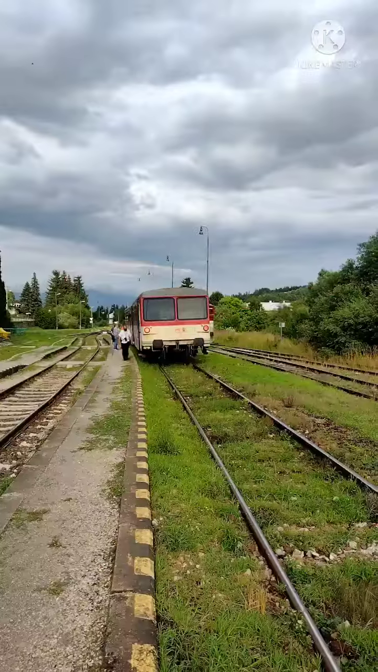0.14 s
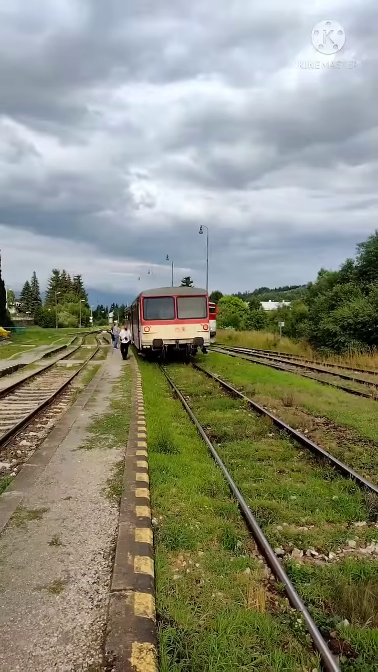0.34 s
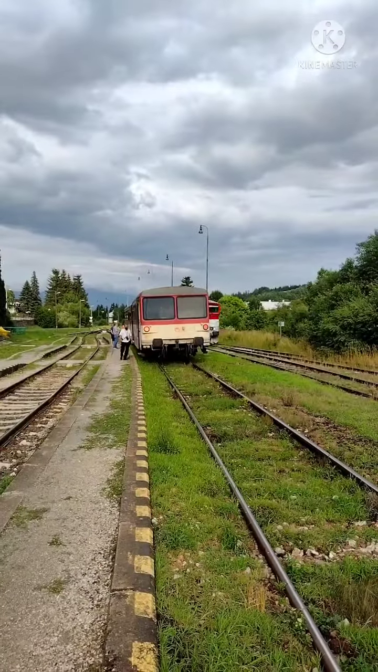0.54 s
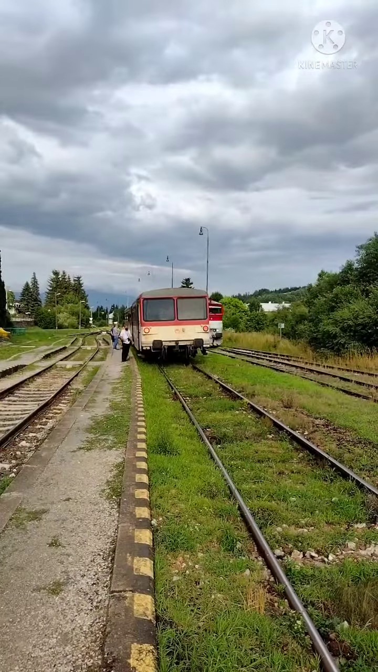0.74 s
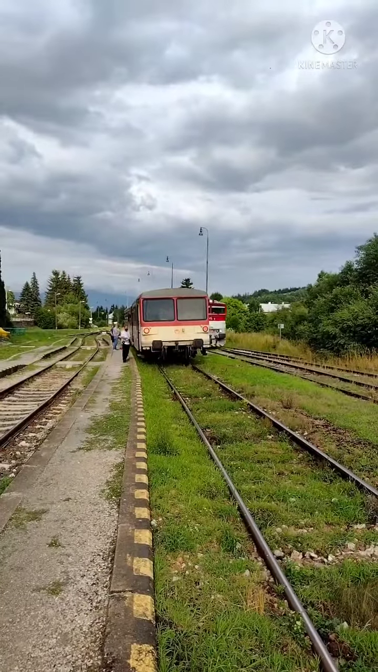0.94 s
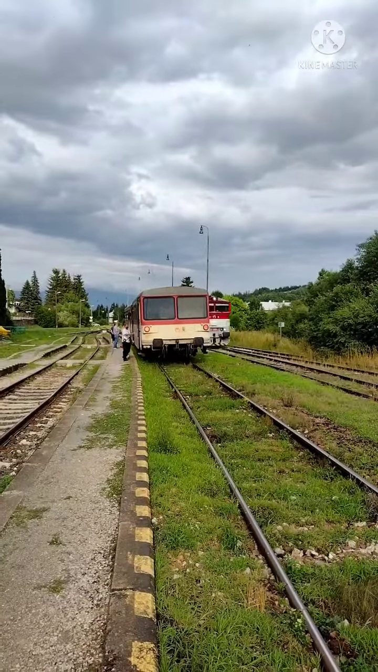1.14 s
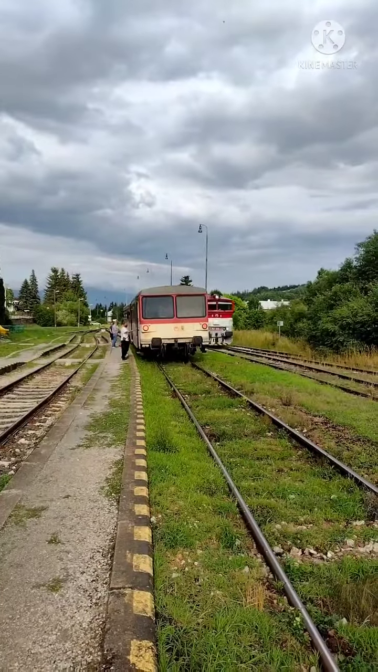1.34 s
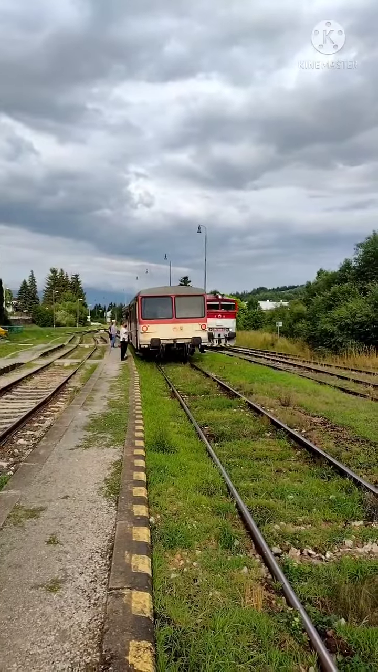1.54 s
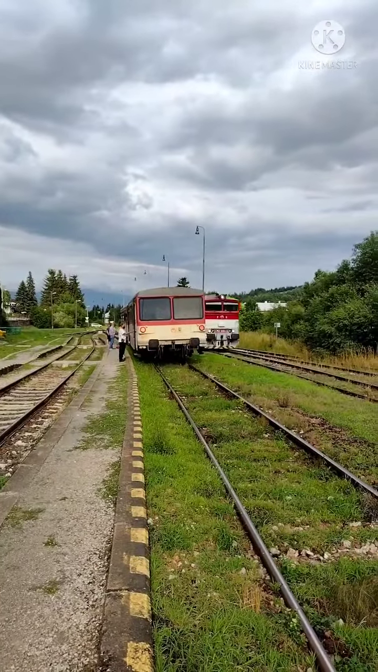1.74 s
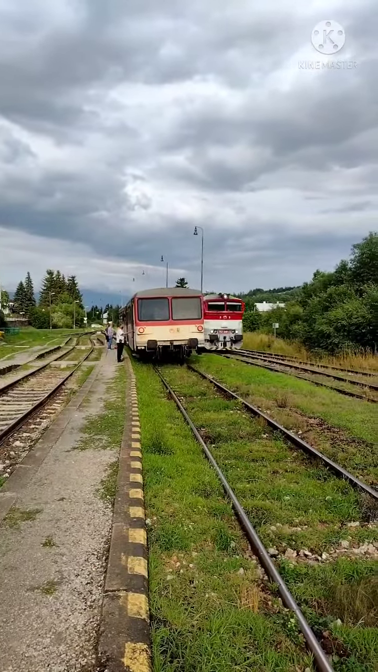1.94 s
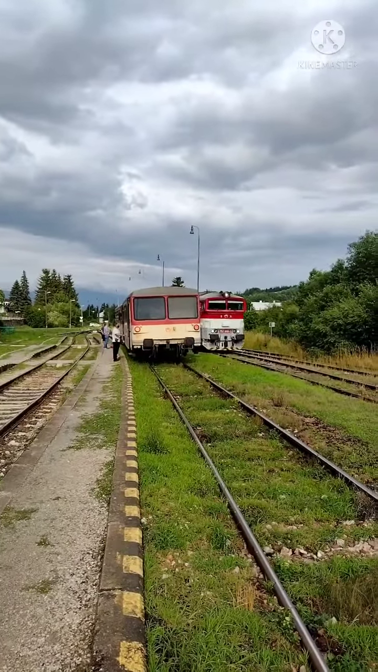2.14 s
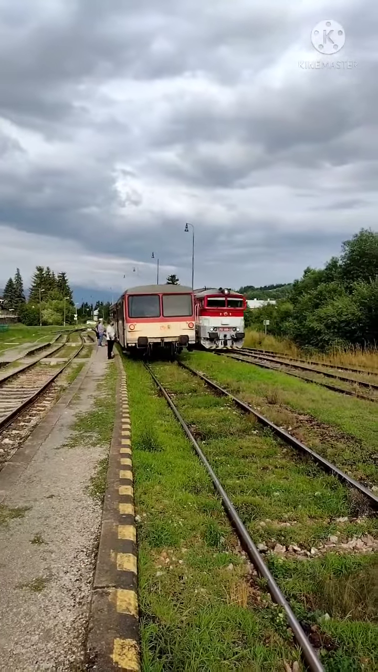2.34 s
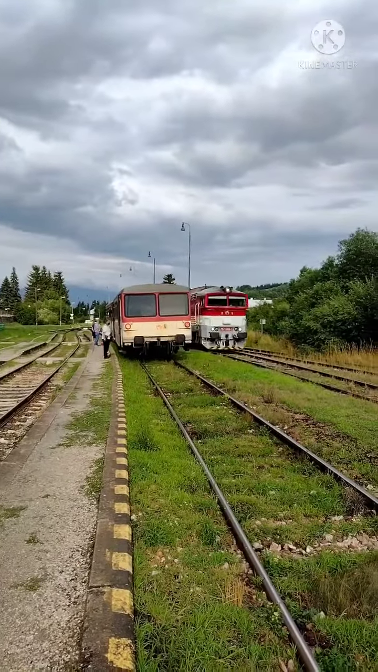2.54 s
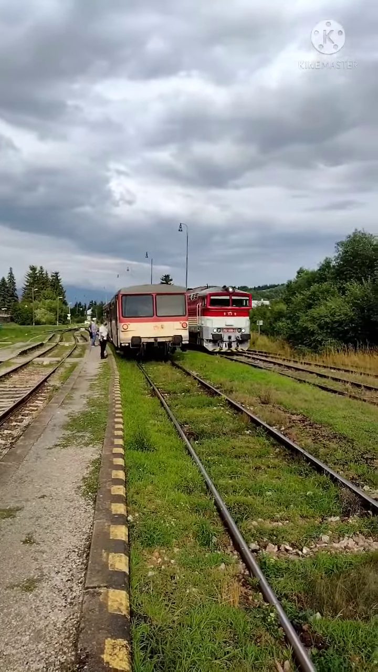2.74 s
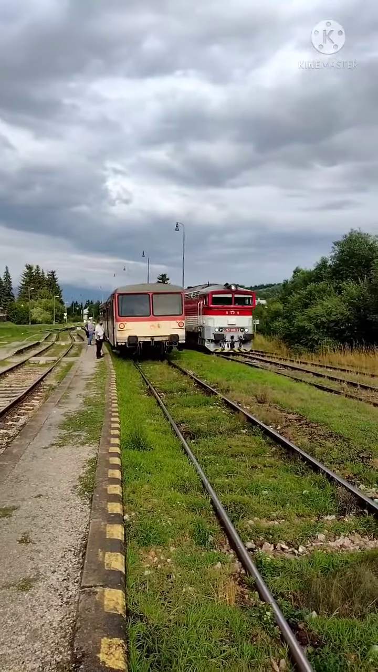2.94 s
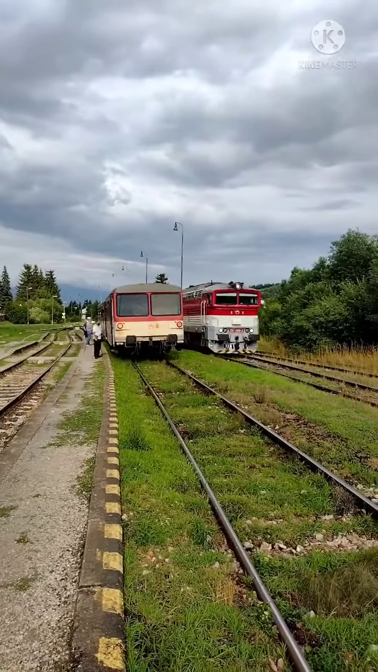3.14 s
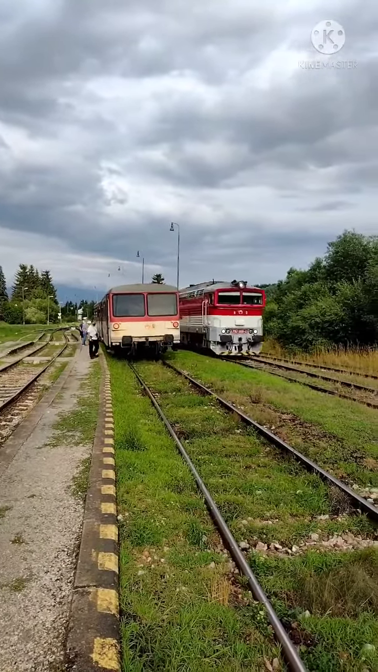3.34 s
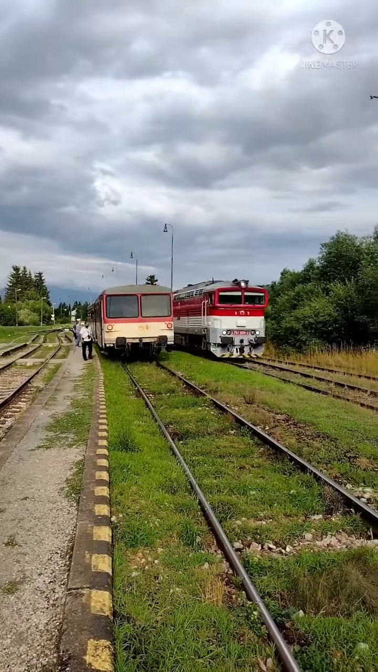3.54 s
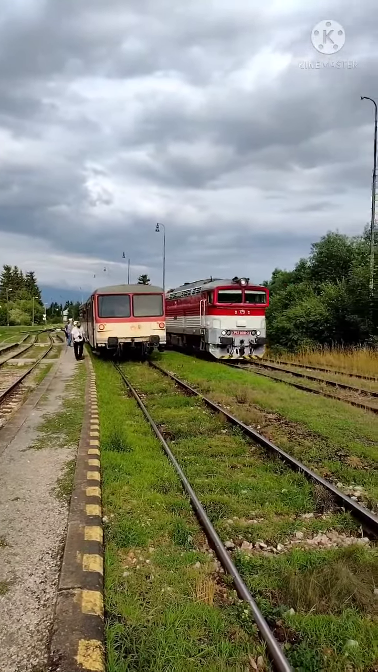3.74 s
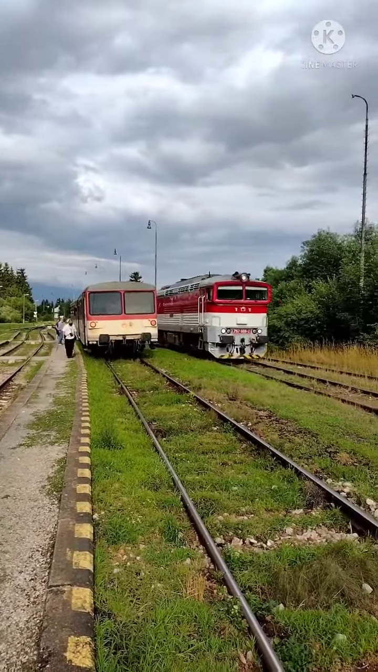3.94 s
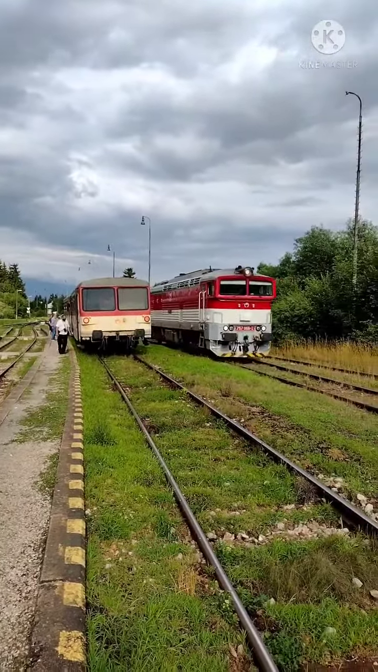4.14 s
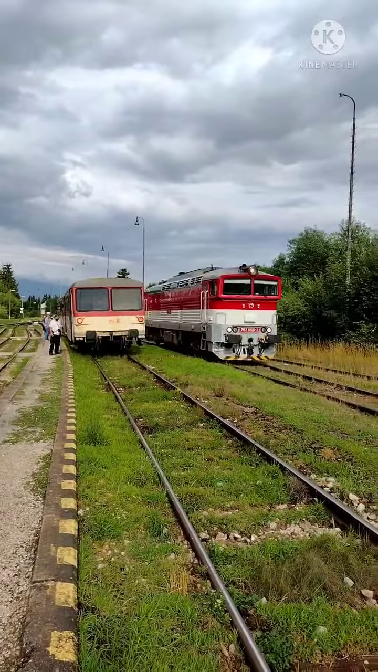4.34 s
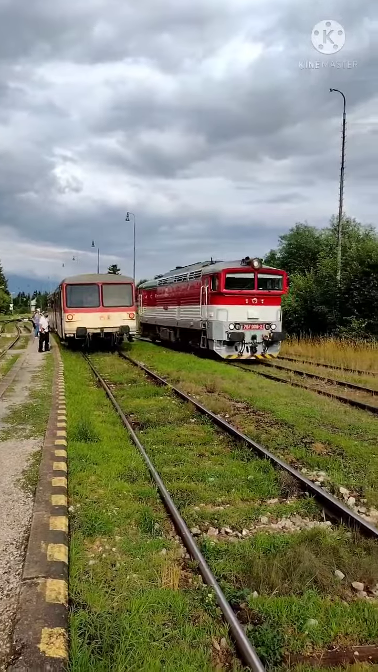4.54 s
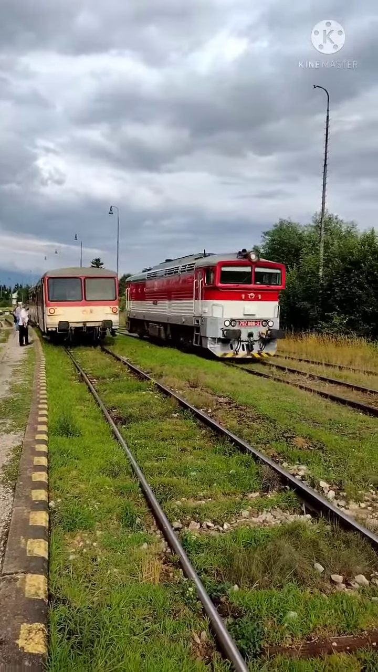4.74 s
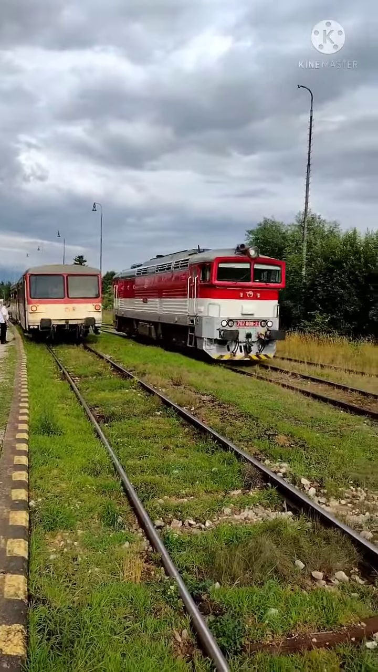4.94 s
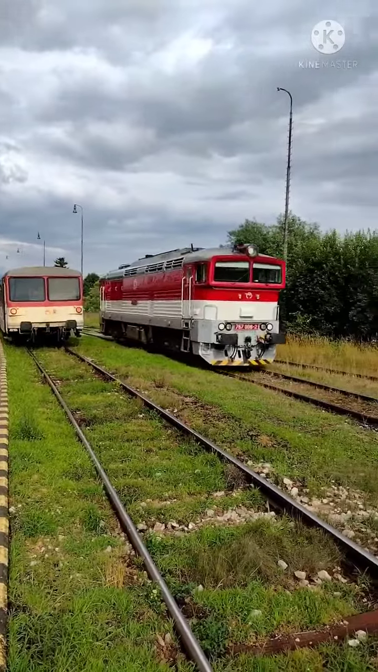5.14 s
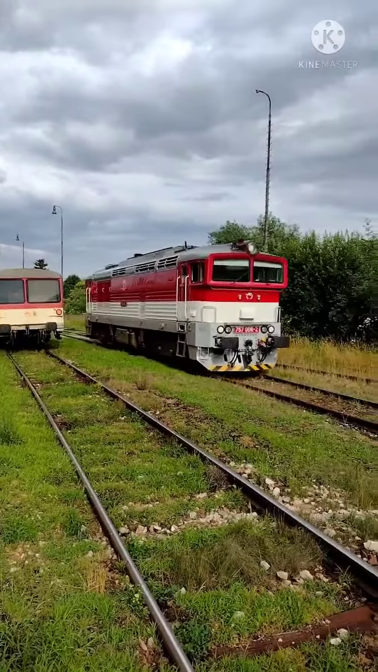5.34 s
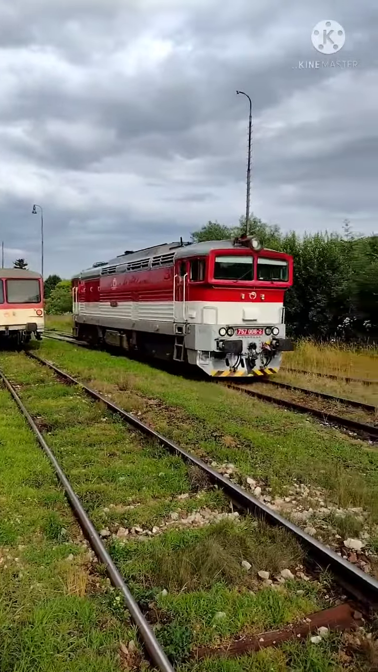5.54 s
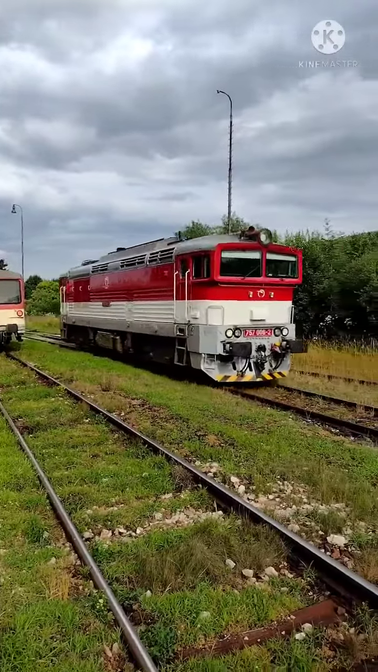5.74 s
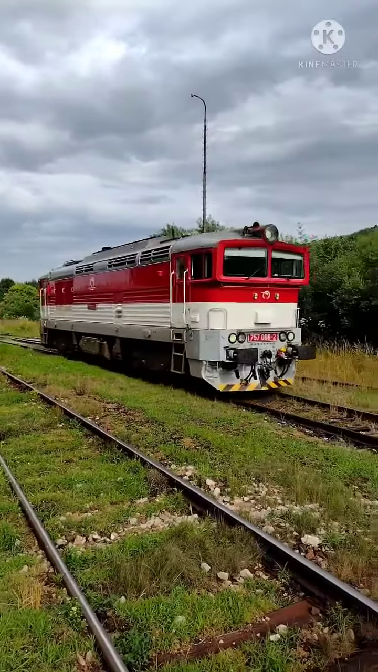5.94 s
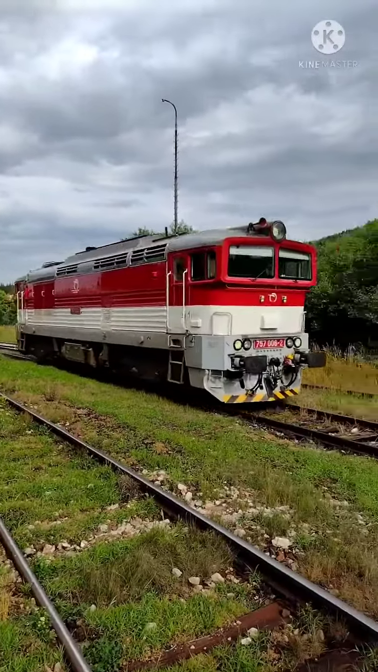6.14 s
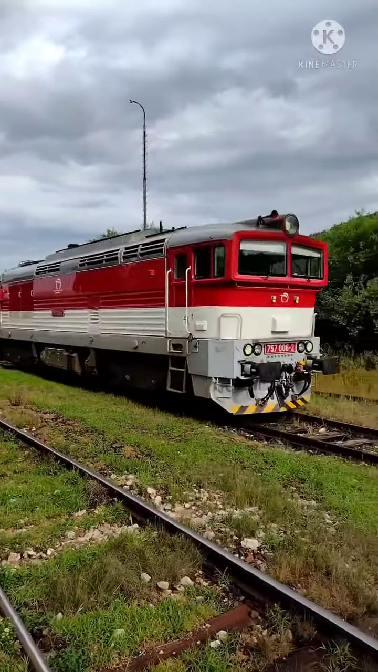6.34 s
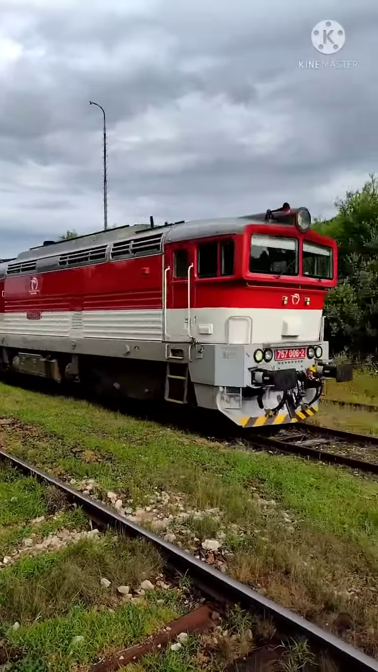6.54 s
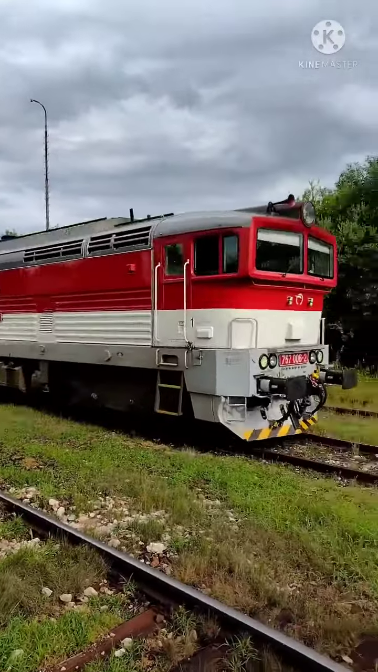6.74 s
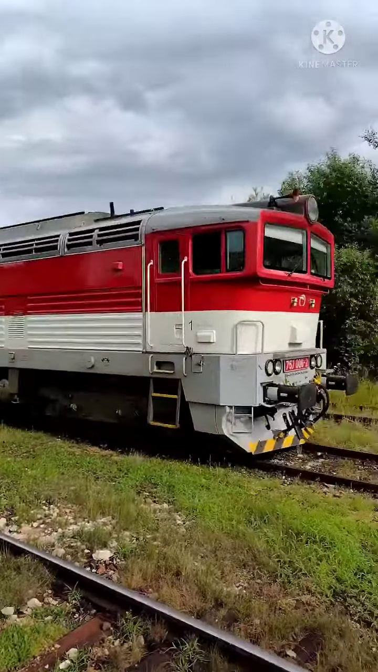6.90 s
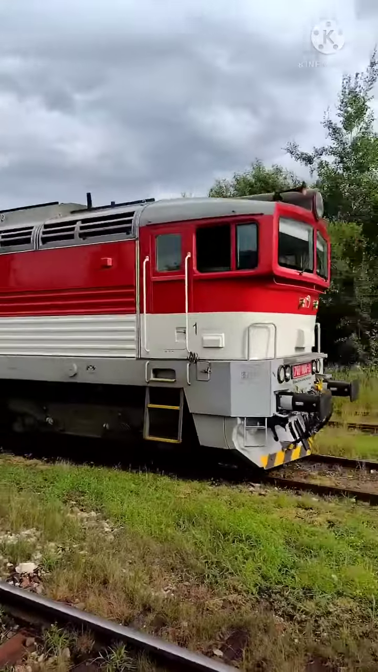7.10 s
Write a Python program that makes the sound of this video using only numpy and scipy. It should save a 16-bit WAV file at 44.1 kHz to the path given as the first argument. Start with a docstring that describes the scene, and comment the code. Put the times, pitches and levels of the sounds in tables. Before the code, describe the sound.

Open station tracks, heard through a stereo phone microphone. From 0 to 1.4 s there is faint background wash, low wind, a tiny tick at 0.2 and a distant muffled diesel throb; soft paired thumps start near 0.7. At 1.4 a heavier joint thump and clang, its second axle following 0.4 s later. Between 1.6 and 2.1 gusts buffet the right side with sharp pops. Around 2.5 the engine emerges from behind the railcar, clearer; at 2.7-3.2 thumps, clangs and crunching grit. More joints at 3.5, 4.3 and 4.7, wind gusting near 4, and thin high squeaks becoming frequent. From 5 s the exhaust swells to a rough, uneven, rasping drone with clatter and wheel hiss. Big thump, clank and grit crack at 5.8, clashing again at 6.2; hollow steel knocks cluster from 6.3 to 7.2, strongest near 6.7 and 6.85. It ends loud, almost alongside, at about 7.3.

```python
"""Diesel locomotive drawing near

A diesel locomotive rolls from behind a parked railcar towards a phone beside the station tracks.
Uneven firing pulses and puffs of noise make its exhaust, which swells to a rough drone as it draws level.
Axles thump in pairs over rail joints and set the bogies (wheel frames) clanging, as bursts of filtered noise.
Grit crunches and wheels hiss as noise, discs sing as sine tones, and struck steel rings as fading sines.
Low noise in gusts, with a few sharp pops, is the wind buffeting mainly the right microphone port."""
import sys
import numpy as np
from scipy import signal
from scipy.fft import rfft, irfft
from scipy.io import wavfile
from scipy.ndimage import uniform_filter1d

SR = 44100
rng = np.random.default_rng(int(sys.argv[2]) if len(sys.argv) > 2 else 0)


def unload_wav(signal):
    """Save mono or channel-first audio to the path in sys.argv[1] as 16-bit WAV at rate SR, clipped to [-1, 1]."""
    wavfile.write(
        sys.argv[1],
        SR,
        np.round(np.clip(np.atleast_2d(signal).T, -1, 1) * 32767).astype(np.int16),
    )


N = 320607
T = np.arange(N) / SR  # time in seconds
FREQ = np.maximum(np.arange(N + 1) * SR / (2 * N), 1)  # filter frequencies in Hz

# How each part carries. Head-on, the body hides the engine, so its sounds fall steeply with distance.
# Each row: level alongside in dB, fall per doubling of distance in dB, loss behind the railcar in dB
# (negative is a gain), place behind the front in m.
REACH = { "drone": (-18.5, 6.5, 4.5, 0.16), "bark": (-13.5, 18.5, 5.5, 4.5),
         "boom": (-19.5, 11.5, -5.5, 4.5), "clatter": (-28, 13, -0.5, -1.8), "rumble": (-36, 6, 2.5, -0.5),
         "hiss": (-35.5, 12.5, -4, -3.5), }
# Colour of the exhaust drone. Each row: frequency in Hz, relative level in dB per Hz.
DRONE = [(20, -9.5), (50, -18.5), (72, -7.5), (88, 1), (125, -2.5), (160, 0), (200, -3), (236, -2),
         (270, -14.5), (350, -38.5), (450, -35), (900, -80)]
# Colour of the exhaust bark. Each row: frequency in Hz, relative level in dB per Hz.
BARK = [(100, -21), (150, -11), (200, -11.5), (240, -3.5), (290, 3.5), (330, 1.5), (375, 1.5), (402, -3.5),
        (440, -20.5), (700, -38)]
# Resonances of the exhaust stack. Each row: frequency in Hz, width in Hz, lift in dB.
STACK = [(151, 12, 7), (241, 14, 7), (325, 22, 3), (365, 18, 4)]
# The exhaust barks harder or softer with the engine's load. Each row: time in seconds, change in dB.
LOAD = [(5.0, 1.5), (5.88, -4), (6.35, -1), (6.64, 2), (7.08, -1.5), (7.25, -1)]
# Exhaust notes swelling out of the drone. Each row: peak in seconds, pitch in Hz, rms level in dB,
# half length in seconds.
NOTES = [(5.2, 148, -31, 0.3), (6.3, 242, -26.5, 0.32), (6.3, 150.5, -30, 0.3), (6.48, 85, -27, 0.22),
         (6.095, 358, -23, 0.025), (6.72, 366, -27, 0.16), (7.08, 157, -27, 0.14), (7.24, 372, -24, 0.07)]
# Colour of the rasp at the stack's mouth. Each row: frequency in Hz, relative level in dB per Hz.
RASP = [(300, -27.5), (450, -6.5), (560, 3.5), (720, 0.0), (900, -3.5), (1200, -16.0), (3000, -49)]
# Colour of the valve-gear clatter. Each row: frequency in Hz, relative level in dB per Hz.
CLATTER = [(250, -32), (440, -14.5), (560, -6), (700, -6.5), (920, -6.5), (1120, -11), (1550, -7),
           (1950, -12.5), (2400, -13), (2800, -12.5), (3300, -16.5), (4200, -18.5), (6000, -28),
           (12000, -41)]
# Resonances of the engine hood. Each row: frequency in Hz, width in Hz, lift in dB.
HOOD = [(580, 120, 1), (1570, 260, 5), (2280, 220, 8), (4100, 300, 3)]
# Colour of the rolling hiss. Each row: frequency in Hz, relative level in dB per Hz.
HISS = [(1500, -31), (3200, 0), (4200, 10.5), (5500, 3.5), (6600, 7), (8000, 4.5), (9800, 6.5),
        (12000, 0.5), (14000, -21)]
# Colour of the highest rolling hiss. Each row: frequency in Hz, relative level in dB per Hz.
SIZZLE = [(5000, -29), (9000, -6), (12300, 6), (13400, 0), (14300, -1), (15000, -11)]
# Resonances of the rail. Each row: frequency in Hz, width in Hz, lift in dB.
RAIL = [(4370, 150, 2), (5470, 160, 3), (7000, 200, 3), (9400, 350, 4), (10600, 200, 3), (11680, 150, 4),
        (12450, 250, 4)]
# Thin modes (ringing pitches) of the wheel discs. Each row: frequency in Hz, relative level in dB.
WHEEL = [(4068, -5), (6577, -8), (9227, -5), (9748, -8), (10147, -8), (10965, 0), (11444, -5), (11677, -1),
         (12224, -5), (12306, -4), (12514, -3)]
# Colour of the clanging, rumbling bogies. Each row: frequency in Hz, relative level in dB per Hz.
CLANG = [(200, -13), (330, 10.5), (440, -4.5), (600, -0.5), (1050, -2.5), (1400, -1), (1600, -6.5),
         (1900, -2.5), (2200, -9.5), (2550, -6), (2850, -13), (4300, -12.5), (9000, -21.5)]
# Resonances of the bogie frames. Each row: frequency in Hz, width in Hz, lift in dB.
FRAME = [(545, 90, 6), (730, 45, 5), (1390, 50, 4), (1900, 170, 6), (2030, 40, 4), (2450, 70, 5),
         (2630, 60, 9), (3050, 60, 8), (3500, 120, 4), (4370, 140, 6), (4880, 100, 6), (5470, 160, 7)]
# Colour of the shaking ground. Each row: frequency in Hz, relative level in dB per Hz.
GROUND = [(10, -6), (25, 5), (45, 9), (65, -9.0), (110, -28), (300, -50)]
# Colour of the wind. Each row: frequency in Hz, relative level in dB per Hz.
BUFFET = [(8, -34), (22, -1.5), (45, 3), (80, -1), (150, -3.5), (220, -16), (320, -18.5), (450, -41),
          (900, -59.5)]
# Gusts that swell and die away. Each row: peak in seconds, level in dB, half length in seconds.
GUSTS = [(0.42, -27, 0.52), (1.94, -21, 0.59), (3.94, -23, 0.41), (5.416, -20.5, 0.47), (6.302, -21, 0.39),
         (7.25, -38, 0.25)]
# Single eddies popping on the right port. Each row: peak in seconds, added pressure with full scale 1,
# length in seconds.
POPS = [(1.657, 0.34, 0.0022), (1.785, 0.32, 0.0023), (1.859, 0.46, 0.0013), (1.933, 0.35, 0.0015),
        (2.016, 0.22, 0.0025), (2.047, 0.49, 0.0026), (2.077, 0.53, 0.0015)]
# Colour of the steady station background. Each row: frequency in Hz, relative level in dB per Hz.
STATION = [(200, 0), (400, -2.5), (620, -1), (950, -7), (1500, -8.5), (3000, -15.5), (6000, -19.5),
           (10000, -22), (14000, -37)]
# Colour of crushed grit. Each row: frequency in Hz, relative level in dB per Hz.
GRIT = [(800, -47), (2000, 3), (4400, 5), (7500, 3), (9600, 7), (12000, 3), (13400, -7), (14300, -25),
        (15000, -44)]
# Larger stones crushed between wheel and rail. Each row: start in seconds, level in dB,
# time to fade by 60 dB in seconds.
CRUNCHES = [(0.73, -43.5, 0.2), (1.838, -37, 0.19), (2.733, -34, 0.1), (2.786, -21.5, 0.1),
            (2.885, -33, 0.2), (2.937, -29, 0.16), (3.209, -27, 0.3), (3.91, -31, 0.18),
            (4.233, -40.5, 0.2), (4.288, -34, 0.25), (5.16, -27.5, 0.14), (5.48, -40, 0.3), (5.61, -39, 1),
            (5.788, -14, 0.085), (5.85, -28.5, 0.58), (6.06, -34, 1), (6.158, -18, 0.12),
            (6.185, -17.5, 0.12), (6.24, -30.5, 0.23), (6.545, -14, 0.04), (6.818, -11, 0.036),
            (7.035, -19.5, 0.15), (7.24, -23, 0.19)]
# Small sharp ticks. Each row: start in seconds, level in dB.
TICKS = [(.207, -32), (1.012, -54)]
# Colour of those ticks. Each row: frequency in Hz, relative level in dB per Hz.
TICK = [(3000, -24), (6000, -1), (8500, 7), (11000, -6), (15000, -22)]
# A flange touches the rail and a disc squeaks. Each row: peak in seconds, pitch in Hz, rms level in dB,
# half length in seconds.
SQUEAKS = [(0.56, 11650, -59, 0.064), (0.92, 10580, -67, 0.04), (1.18, 10600, -64, 0.051),
           (2.48, 12300, -58, 0.078), (3.58, 12510, -49, 0.12), (4.75, 11450, -40, 0.035),
           (5.12, 12500, -36, 0.027), (5.17, 12400, -41, 0.044), (5.63, 6620, -45, 0.033),
           (5.645, 10200, -44, 0.018), (5.87, 9235, -45, 0.06), (6.01, 12540, -41, 0.025),
           (6.25, 11000, -37, 0.091), (6.66, 12224, -42, 0.05), (6.675, 10200, -44, 0.02),
           (6.88, 10965, -50, 0.05)]
# A bogie crosses a rail joint. Each row: start in seconds, thump in dB, clang in dB, grit in dB,
# ring time to fade by 60 dB in seconds, second axle against the first in dB.
JOINTS = [(0.675, -38, -49, -49.5, 0.44, -2), (1.427, -25, -37, -42, 1, 1.3),
          (2.732, -29, -38, -43, 0.96, -2.5), (2.78, -19, -29.5, -31, 1.88, -1.7),
          (3.495, -32.5, -40.5, -44, 0.49, 4), (4.287, -23, -33, -33.5, 1.4, -5.5),
          (4.356, -42, -29.5, -39, 0.82, -18), (4.696, -24, -32, -50, 2.5, -7.5),
          (5.77, -23.5, -27.5, -32.5, 0.89, -0.5)]
# Colour of the axle thump. Each row: frequency in Hz, relative level in dB per Hz.
THUMP = [(30, 2.5), (80, -2), (140, 10.5), (240, -0.5), (330, -15.5), (450, -64), (900, -28)]
# Colour of the axle-box thud. Each row: frequency in Hz, relative level in dB per Hz.
AXLE_BOX = [(150, -14), (340, 1), (700, 7), (1200, -6), (2500, 3.5), (6000, -50)]
# The heaviest axle blows bounce the track in its bed. Each row: start in seconds, level in dB.
BUMPS = [(1.437, -21), (2.818, -17), (3.189, -14), (4.286, -26), (4.695, -17.5), (5.775, -11), (6.35, -6)]
# Modes of the bouncing track. Each row: nominal frequency in Hz, level against the blow in dB,
# time to fade by 60 dB in seconds.
TRACK_BED = [(112, -7, 0.067), (162, -2, 0.069), (238.5, -13.5, 0.16)]
# A tread strikes or scrapes the bare rail end. Each row: start in seconds, level in dB,
# time to fade by 60 dB in seconds.
CLANKS = [(1.432, -39, 0.12), (1.841, -44, 0.12), (2.782, -30, 0.1), (3.184, -29, 0.3), (4.29, -25, 0.09),
          (4.36, -32.5, 0.4), (4.7, -34, 0.44), (5.786, -19.5, 0.16), (6.175, -26.5, 0.3),
          (6.197, -21, 0.06)]
# Colour of steel clashing on steel. Each row: frequency in Hz, relative level in dB per Hz.
CLASH = [(400, -29), (900, -2), (1500, 4), (2300, 1.5), (3200, -6.5), (5500, -6.5), (7500, -13), (12000, -22)]
# Hollow knocks from the running gear. Each row: start in seconds, level in dB.
KNOCKS = [(2.731, -28.5), (2.748, -29.5), (2.792, -25), (3.187, -25), (5.015, -30), (5.273, -21.5),
          (5.771, -17), (6.081, -25), (6.343, -14.5), (6.394, -19), (6.43, -23), (6.456, -18.5),
          (6.497, -19), (6.656, -10.5), (6.671, -12.5), (6.747, -23), (6.783, -19), (6.855, -11.5),
          (7.033, -19), (7.145, -20), (7.169, -19)]
# Colour of the knocked body. Each row: frequency in Hz, relative level in dB per Hz.
KNOCK_BODY = [(100, -26), (280, 1), (450, 1.5), (750, 0.5), (1000, -6), (1500, -15), (3000, -29)]
# Modes of the knocked steelwork. Each row: nominal frequency in Hz, level against the knock in dB,
# time to fade by 60 dB in seconds.
STEELWORK = [(345, -4, 0.13), (472, -11, 0.047), (570, -9, 0.06), (668, -6, 0.07), (768, -10, 0.066),
             (900, -14, 0.05), (1390, -25, 0.022)]
# Likeness of left and right. Each row: frequency in Hz, correlation from 0 to 1.
LIKENESS = [(60, 1), (320, 0.97), (450, 0.8), (660, 0.98), (1080, 0.44), (1500, 0.49), (2280, 0.66),
            (2950, 0.27), (4200, 0.6), (6500, 0.34), (14000, 0.06)]
# Sound from the side bends round the phone to the left port. Each row: frequency in Hz, lag in radians.
PORT_LAG = [(100, 0), (430, 0.15), (540, 0.77), (800, 0.83), (1000, 0), (1300, 0.3), (1600, 0.32),
            (2500, 0), (3300, 1.63), (6500, 1.23)]

SPEED_M_S, PASSES_S, TRACK_M = 6.14, 7.326, 8.15  # steady speed; when the front draws level; track distance
CLEAR_S, CLEARING_S = 2.52, 0.49  # when and how gradually it comes out from behind the railcar
FIRING_HZ, BOOM_HZ = 76.05, 68.35  # centre of the wandering firing rate; centre of the deepest exhaust note
LOPE_DB = 2.2  # how unevenly the drone throbs
RASP_DB, RASP_SURGE_DB = -7.5, 1.8  # the rasp against the bark, and how much it surges
NOTE_WAVER, NOTE_THROB_DB = 0.005, 2  # spread of pitch as a fraction, and of level
BREEZE_DB, STATION_DB = -38, -50.5  # wind between the gusts; station background
AXLE_GAP_S = 0.406  # the second axle of a bogie follows the first over each joint
CRUSH_S = 0.28  # how long a tread takes to roll clear of the sand at a joint
# small grains: average number, level against the wheel hiss, greatest change either way, fade by 60 dB
SAND_PER_S, SAND_DB, SAND_SPREAD_DB, SAND_T60_S = 12, -5, 6, 0.063
KNOCK_RISE_S, STRIKE_DETUNE = 0.0007, 0.05  # onset of struck steel; spread of its pitches as a fraction
TOP_HZ = 14600  # the phone cuts the treble above this


def undb(db):
    """Turn decibels into a gain."""
    return 10 ** (np.asarray(db) / 20)


def unit(x):
    """Scale to an rms (average strength) of 1."""
    return x / np.sqrt(np.mean(x ** 2))


def across(points):
    """Join (Hz, value) points with straight lines on a log-frequency axis."""
    hz, value = np.transpose(points)
    return np.interp(np.log(FREQ), np.log(hz), value)


def colour(x, points, resonances=()):
    """Filter with a broad colour and narrow resonances, without ringing ahead of a sound; rms becomes 1."""
    db = across(points)
    for hz, width, lift_db in resonances:
        db = db + lift_db / (1 + (2 * (FREQ - hz) / width) ** 2)
    # folding the cepstrum forward gives the filter only a response after each input
    cepstrum = irfft(np.log(undb(db)))
    cepstrum[1:N] *= 2
    cepstrum[N + 1:] = 0
    response = np.exp(rfft(cepstrum))
    return unit(irfft(rfft(x, 2 * N) * response)[..., :N])


def spread(mid, side):
    """Mix two unrelated signals into two channels, alike in the bass and diffuse in the treble."""
    alike = np.clip(across(LIKENESS), 0, 1)
    shared = rfft(mid, 2 * N) * np.sqrt(1 + alike)
    opposed = rfft(side, 2 * N) * np.sqrt(1 - alike)
    return unit(irfft(np.array([shared + opposed, shared - opposed]))[:, :N])


def noise():
    """White noise at the two ports."""
    return spread(*rng.standard_normal((2, N)))


def pan(db):
    """Channel gains for a left minus right level in dB."""
    return undb(np.array([[db], [-db]]) / 2)


def walk(rate):
    """Smooth random wandering with rms 1, drawn anew about `rate` times a second."""
    k = max(int(SR / rate), 1)
    steps = np.repeat(rng.standard_normal(N // k + 1), k)
    return unit(uniform_filter1d(uniform_filter1d(steps, k), k)[:N])


def fade(start, t60, rise):
    """Envelope of one blow: a quick rise and an exponential decay."""
    age = np.maximum(T - start, 0)
    decay = np.exp(-np.minimum(np.log(1000) * age / t60, 20))
    return (1 - np.exp(-age / rise)) * decay


def blows(rows, rise):
    """Joint envelope of (s, dB, t60) blows; their powers add."""
    return np.sqrt(sum((undb(db) * fade(s, t60, rise)) ** 2 for s, db, t60 in rows))


def swell(peak, half):
    """Bell-shaped envelope around a peak."""
    return np.exp(-np.minimum(((T - peak) / half) ** 2, 30))


def tones(rows, waver, throb_db, rate):
    """Wavering, throbbing sine tones that each swell once."""
    clock = T + waver * np.cumsum(walk(rate)) / SR
    throb = unit(undb(throb_db * walk(rate)))
    total = 0
    for s, hz, db, half in rows:
        tone = np.sin(2 * np.pi * (hz * clock + rng.random()))
        total = total + undb(db) * swell(s, half) * tone
    return np.sqrt(2) * throb * total  # a sine of peak sqrt(2) has rms 1


def struck(hits, modes):
    """Strikes ring a set of fading modes, whose pitches shift a little at each strike."""
    out, age = np.zeros(N + SR // 2), T[:SR // 2]
    all_shifts = 1 + STRIKE_DETUNE * rng.standard_normal((len(hits), len(modes)))
    onset = 1 - np.exp(-age / KNOCK_RISE_S)
    for (s, strength_db), shifts in zip(hits, all_shifts):
        ring = 0
        for (hz, db, t60), shift in zip(modes, shifts):
            ring = ring + undb(db - 60 * age / t60) * np.sin(2 * np.pi * hz * shift * age)
        start = int(s * SR)
        out[start:start + len(age)] += undb(strength_db) * ring * onset
    return out[:N]


def approach(part):
    """Gain of one part of the locomotive as it leaves the railcar's shadow and draws near."""
    level_db, fall_db, shade_db, behind_m = REACH[part]
    distance = np.hypot(SPEED_M_S * (PASSES_S - T) + behind_m, TRACK_M)
    hidden = (1 - np.tanh((T - CLEAR_S) / CLEARING_S)) / 2
    return undb(level_db - fall_db * np.log2(distance / TRACK_M) - shade_db * hidden)


def axles():
    """Two blows for each joint: (s, thump dB, clang dB, grit dB, t60 s)."""
    rows = []
    for s, thump, clang, sand, t60, second_db in JOINTS:
        for late, db in ((0, 0), (AXLE_GAP_S, second_db)):
            rows.append((s + late, thump + db, clang + db, sand + db, t60))
    return rows


def engine(scatter_db=1.0, gas=0.93, puff=0.91, rattle=0.32, throb_db=2.0):
    """Uneven firings and their gas puffs ring the exhaust stack; valve gear clatters in step under the hood."""
    drone_gain = approach("drone")
    bark_gain = approach("bark") * undb(np.interp(T, *np.transpose(LOAD)))
    turns = np.cumsum(FIRING_HZ * (1 + 0.12 * walk(55))) / SR
    firing, phase = turns.astype(int), turns % 1  # number of the firing, and how far it has got
    strength = undb(scatter_db * rng.standard_normal(N // 100))[firing]
    pulses = unit(np.diff(firing, prepend=0) * strength)
    puffs = unit(strength * np.exp(-phase / puff))
    flow = 0.34 * pulses + gas * puffs * noise()
    drone = drone_gain * colour(flow * undb(LOPE_DB * walk(16)), DRONE)
    bark = bark_gain * colour(flow, BARK, STACK)
    boom_phase = 2 * np.pi * np.cumsum(BOOM_HZ + 1.8 * walk(12)) / SR
    boom = unit(np.sin(boom_phase)) * approach("boom") * undb(throb_db * walk(9.1))
    clatter = colour(noise() * (1 + rattle * puffs) * undb(1.7 * walk(25)), CLATTER, HOOD)
    # the same flow also rasps in the mouth of the stack
    rasp = colour(flow * undb(RASP_SURGE_DB * walk(60)), RASP) * bark_gain * undb(RASP_DB)
    notes = tones(NOTES, NOTE_WAVER, NOTE_THROB_DB, rate=22)
    exhaust = drone + bark + boom + notes + rasp
    return exhaust * pan(-0.85) + clatter * approach("clatter") * pan(-0.82)


def wheels(rumble_gain, hiss_gain, grain_db=1.0, flutter_db=2.0, air=0.42):
    """Rough treads hiss on the rail, shake the bogie frames and set the wheel discs singing by turns."""
    contact = noise() * undb(grain_db * walk(900) + flutter_db * walk(40))
    nearness = (hiss_gain / hiss_gain.max()) ** air  # the highest treble fades first with distance
    sizzle = colour(noise(), SIZZLE) * nearness * undb(-4.0) * pan(5.5)
    hiss = colour(contact, HISS, RAIL) * pan(-0.76) + sizzle
    sing_db, swell_db, waver_hz = -9.5, 5, 9
    song = 0  # each disc mode swells and fades on its own
    for hz, db in WHEEL:
        phase = 2 * np.pi * np.cumsum(hz + waver_hz * walk(66)) / SR
        tone = np.sin(phase + rng.uniform(0, np.pi, (2, 1)))
        song = song + undb(db + swell_db * walk(14)) * tone
    singing = unit(song) * undb(sing_db) * nearness
    rumble = colour(noise() * undb(0.18 * walk(27)), CLANG, FRAME)
    return (hiss + singing) * hiss_gain + rumble * rumble_gain * pan(-2.6)


def ground(db=-42):
    """The heavy train shakes the track bed all the while, as steady low noise."""
    return colour(noise(), GROUND) * undb(db)


def wind(gust_db=4.0, left_db=-11):
    """Eddies buffet each port on its own, mostly the right; the sharpest ones pop."""
    swells = sum((undb(db) * swell(s, half)) ** 2 for s, db, half in GUSTS)
    gain = np.sqrt(undb(BREEZE_DB) ** 2 + swells)
    eddies = np.array([rng.standard_normal(N) * undb(gust_db * walk(45)) for _ in range(2)])
    ports = colour(eddies, BUFFET) * gain * undb([[left_db], [0.6]])
    for s, size, length in POPS:
        age = (T - s) / length
        ports[1] += size * (1 - age ** 2) / (1 + age ** 2) ** 2  # a push between two dips of suction
    return ports


def station(swell_db=2.0):
    """The faint wash of the surroundings, gently rising and falling."""
    return colour(noise(), STATION) * undb(STATION_DB + swell_db * walk(7.5))


def grit(tick_t60=0.026, top_db=-6, air=1.0):
    """Sand cracks under the treads in lumpy bursts, at every joint and in between, with a few lone ticks."""
    lumps = undb(2.4 * walk(1200) + 1.9 * walk(220) + 0.6 * walk(60))
    near = approach("hiss")
    nearness = (near / near.max()) ** air  # only close cracks keep their top
    top = colour(noise() * lumps, SIZZLE) * undb(top_db) * nearness
    cracks = colour(noise() * lumps, GRIT, RAIL) + top
    joint_power = 0
    for s, _, _, db, t60 in axles():
        burst = undb(db) * fade(s, t60, rise=0.013) * swell(s, CRUSH_S)
        joint_power = joint_power + burst ** 2
    crushed = np.sqrt(joint_power + blows(CRUNCHES, rise=0.009) ** 2)
    tick = colour(noise(), TICK)
    # small grains crack at random, level with the wheels' approach
    chance = rng.random((64, 2))
    times = np.cumsum(0.5 + chance[:, 0]) / SAND_PER_S
    levels = SAND_DB + SAND_SPREAD_DB * (2 * chance[:, 1] - 1)
    grains = [(s, db, SAND_T60_S) for s, db in zip(times, levels) if s < T[-1]]
    sand = blows(grains, rise=0.0031)
    bursts = np.hypot(crushed, sand * near)
    ticks = tick * blows([(s, db, tick_t60) for s, db in TICKS], rise=0.00081)
    return cracks * bursts * pan(-0.3) + ticks


def squeaks():
    """Flanges brush the rail and draw thin, scratchy squeaks from the wheel discs, more often late on."""
    strays = []  # extra squeaks at random in the later part, near the pitches of the disc modes
    for a, b, c, d in rng.random((22, 4)):
        hz = WHEEL[int(b * len(WHEEL))][0] * (0.99 + 0.02 * c)
        strays.append((7.3 - 2.7 * a, hz, -41 - 8 * a - 6 * d, 0.018 + 0.025 * c))
    return np.array([tones(SQUEAKS + strays, waver=0.0045, throb_db=4.5, rate=220) for _ in range(2)])


def joints(thump_t60=0.79, shake_db=-2.0, thud_db=-7.0, thud_t60=0.21):
    """Each axle thumps the sleepers and thuds the axle box; the bogie frame and its loose parts clang on."""
    s, thump_db, clang_db, _, t60 = np.transpose(axles())
    thump = blows([(at, db, thump_t60) for at, db in zip(s, thump_db)], rise=0.011)
    thud = blows([(at, db + thud_db, thud_t60) for at, db in zip(s, clang_db)], rise=0.00065)
    clang = blows(zip(s, clang_db, t60), rise=0.01)
    box = colour(noise(), AXLE_BOX)
    frame = colour(noise() * undb(shake_db * walk(180)), CLANG, FRAME)
    low = thump * colour(noise(), THUMP) + struck(BUMPS, TRACK_BED)
    return low + (thud * box + clang * frame) * pan(-1.8)


def chirp(s=0.75, hz=3550, db=-53, length=0.01):
    """One faint, short chirp far off: a sine tone under a bell-shaped envelope."""
    return undb(db) * swell(s, length) * np.sin(2 * np.pi * hz * T)


def clanks():
    """Treads strike the rail end: a bright, abrupt clash that rings the bogie frame."""
    clash = colour(noise() * undb(2 * walk(250)), CLASH, FRAME)
    return clash * blows(CLANKS, rise=0.005) * pan(-1)


def knocks(body_t60=0.036, chatter_db=-14, chatter_t60=0.46):
    """Slack in the running gear knocks against hollow steelwork, which rings briefly and chatters on."""
    body = colour(noise(), KNOCK_BODY)
    blow = blows([(s, db, body_t60) for s, db in KNOCKS], rise=KNOCK_RISE_S)
    chatter = blows([(s, db + chatter_db, chatter_t60) for s, db in KNOCKS], rise=0.01)
    chatter = chatter * unit(undb(3.5 * walk(90)))
    return body * np.hypot(blow, chatter) + struck(KNOCKS, STEELWORK)


def aslant(ports):
    """A source beside the phone reaches the left port late, by an amount that depends on frequency."""
    left = irfft(rfft(ports[0], 2 * N) * np.exp(-1j * across(PORT_LAG)))[:N]
    return np.array([left, ports[1]])


def scene():
    """Locomotive, track, station and wind together."""
    body = aslant(engine() + wheels(approach("rumble"), approach("hiss")) + knocks())
    track = joints() + clanks() + grit() + squeaks() + ground()
    return body + track + wind() + chirp() + station()


def record(dry):
    """The phone rounds the loudest peaks and cuts the highest treble."""
    ceiling = 0.75  # rounded peaks stay below this, with full scale 1
    rounded = dry / (1 + (dry / ceiling) ** 4) ** 0.25
    return signal.sosfilt(signal.ellip(8, 0.2, 80, TOP_HZ, fs=SR, output="sos"), rounded)


dry = scene()
out = record(dry)
unload_wav(out)
```